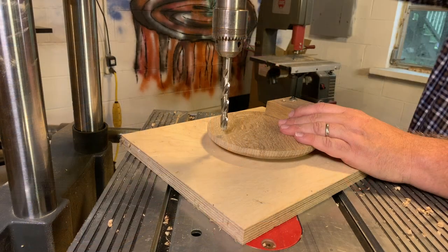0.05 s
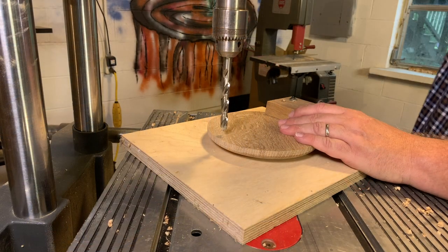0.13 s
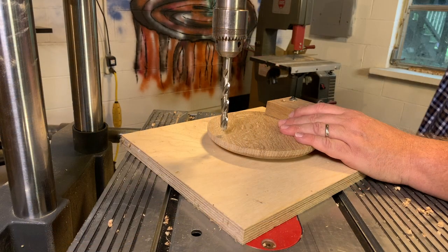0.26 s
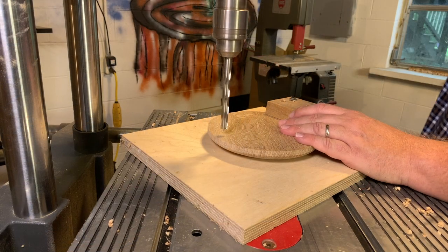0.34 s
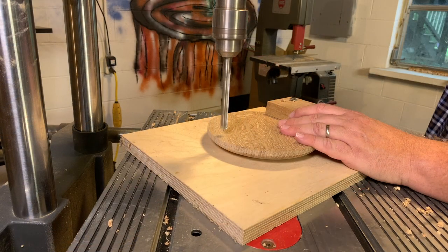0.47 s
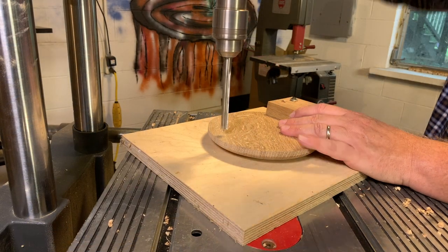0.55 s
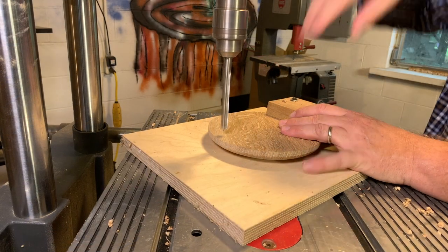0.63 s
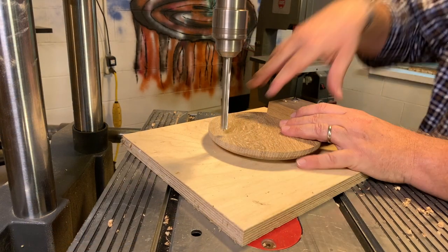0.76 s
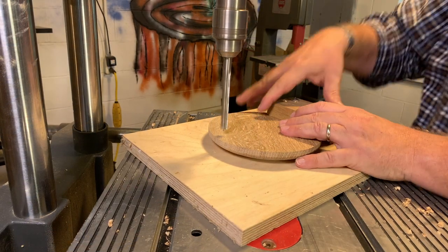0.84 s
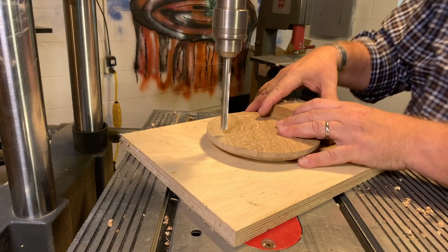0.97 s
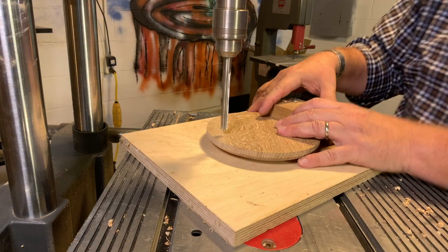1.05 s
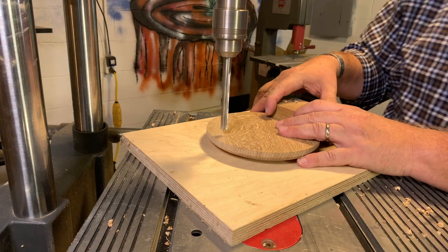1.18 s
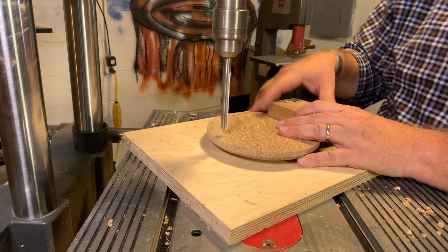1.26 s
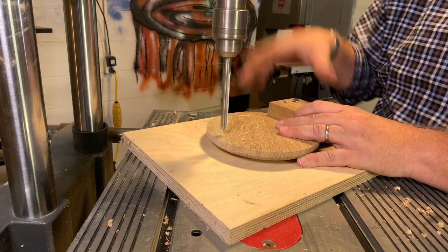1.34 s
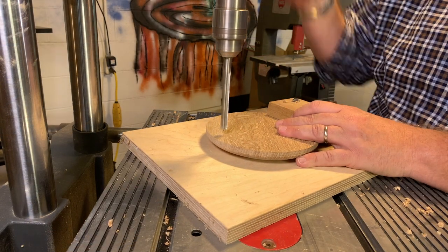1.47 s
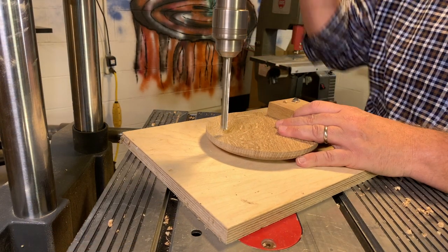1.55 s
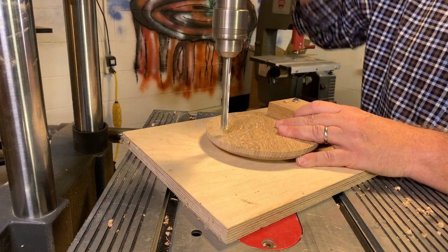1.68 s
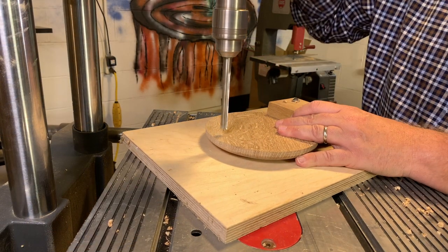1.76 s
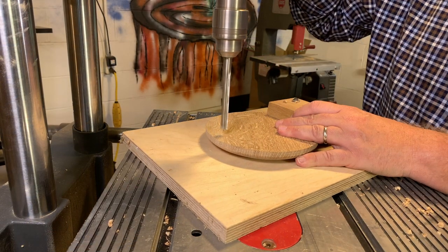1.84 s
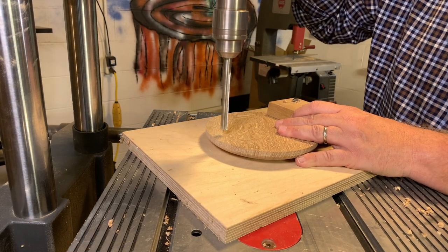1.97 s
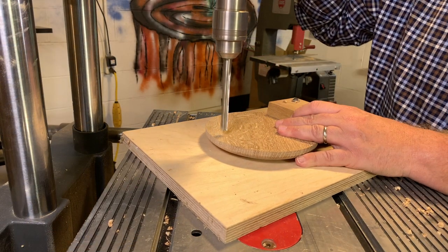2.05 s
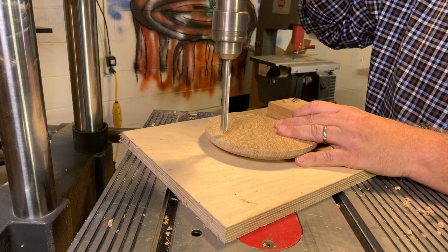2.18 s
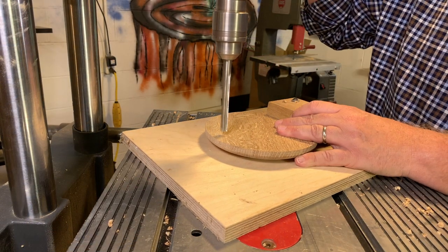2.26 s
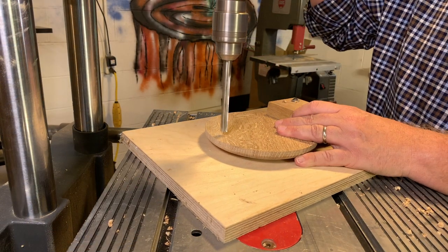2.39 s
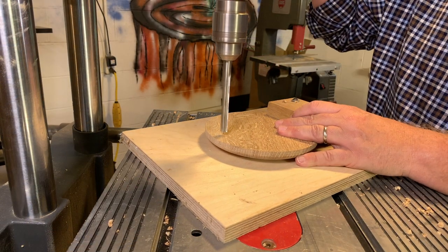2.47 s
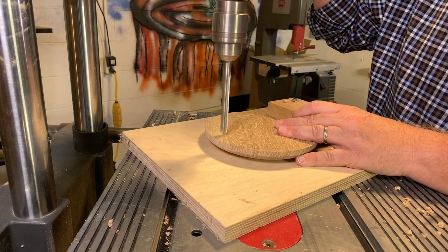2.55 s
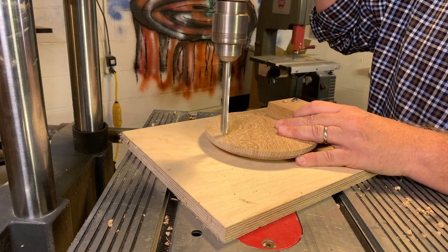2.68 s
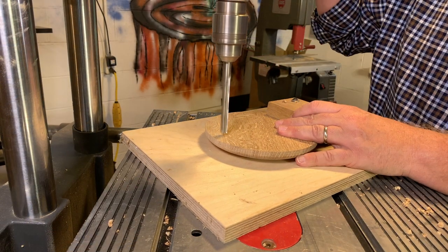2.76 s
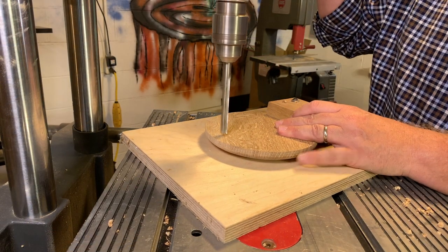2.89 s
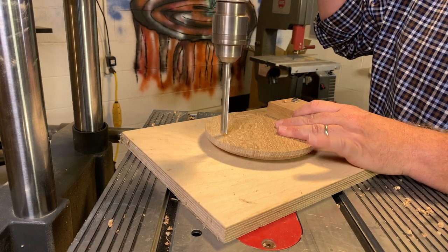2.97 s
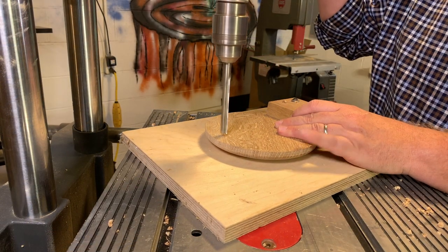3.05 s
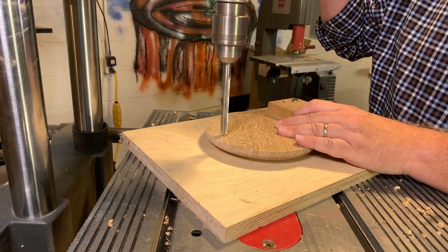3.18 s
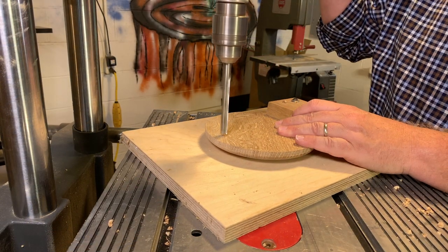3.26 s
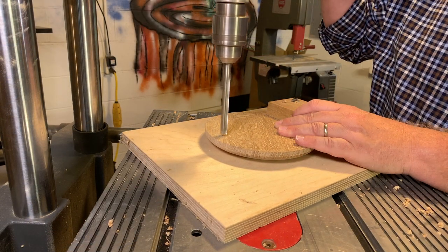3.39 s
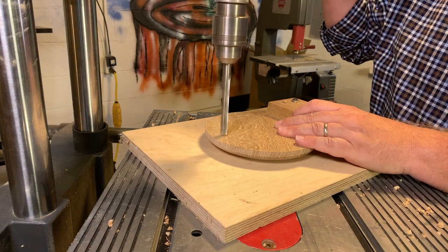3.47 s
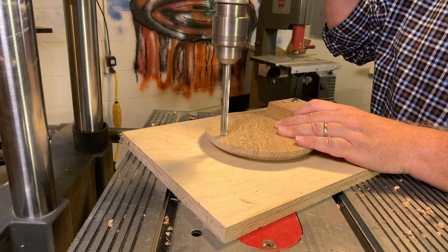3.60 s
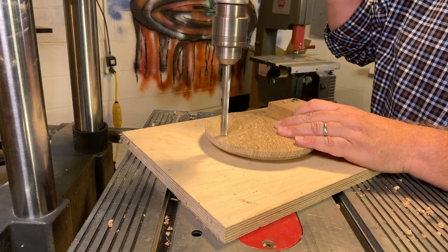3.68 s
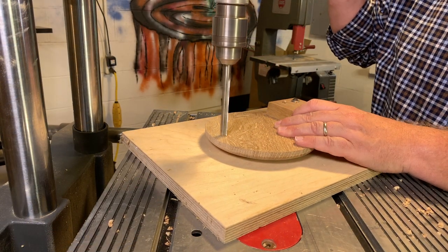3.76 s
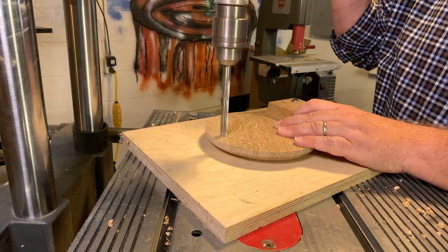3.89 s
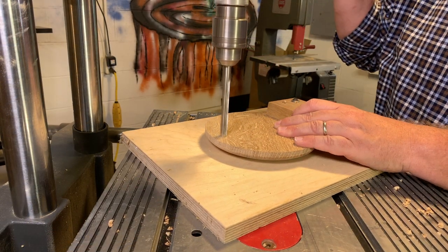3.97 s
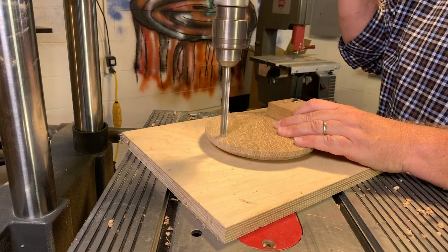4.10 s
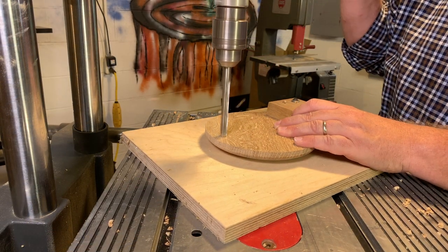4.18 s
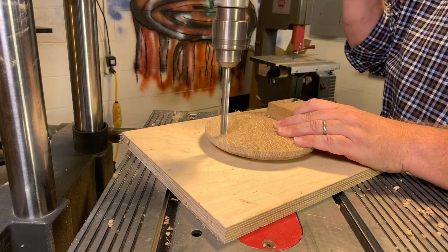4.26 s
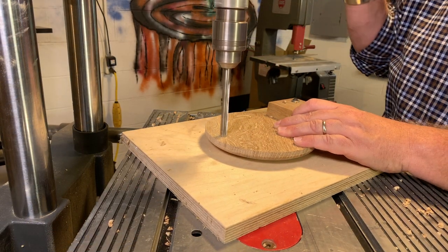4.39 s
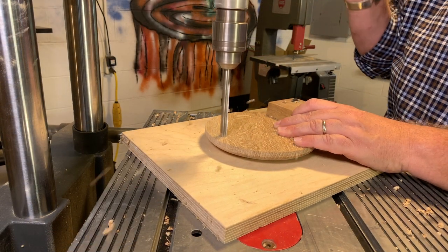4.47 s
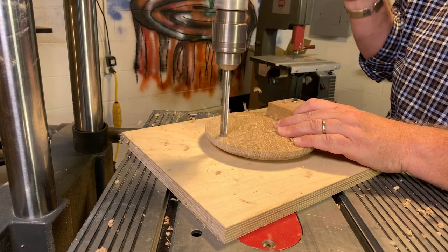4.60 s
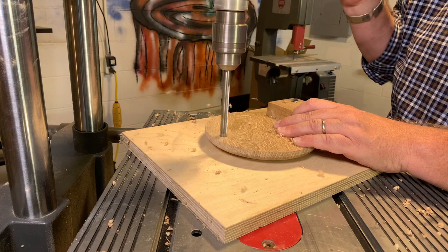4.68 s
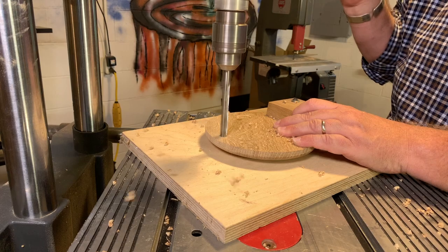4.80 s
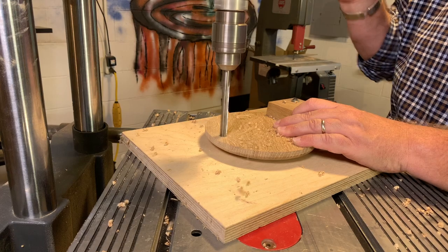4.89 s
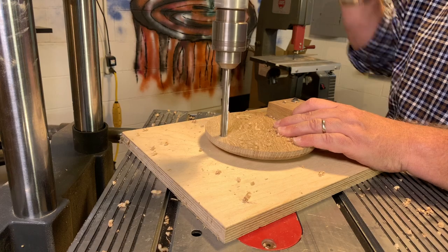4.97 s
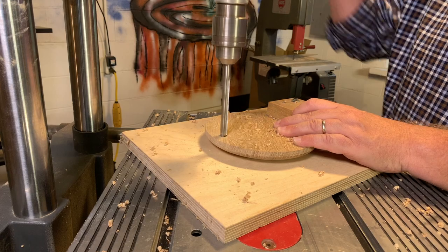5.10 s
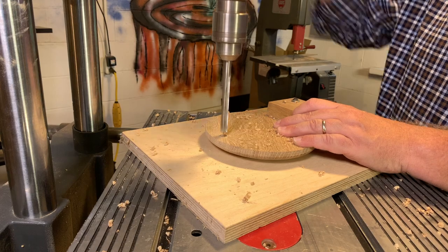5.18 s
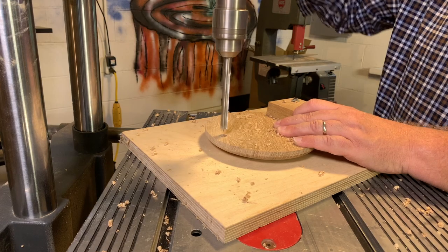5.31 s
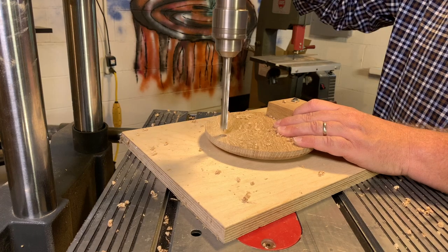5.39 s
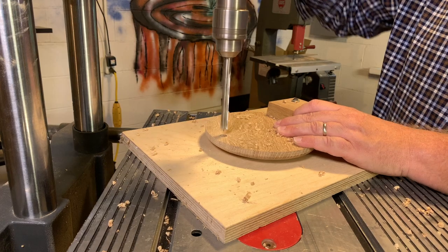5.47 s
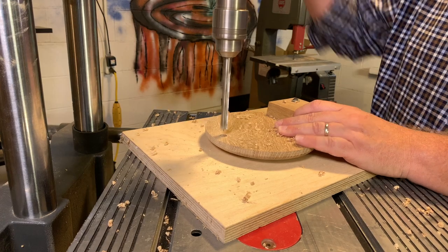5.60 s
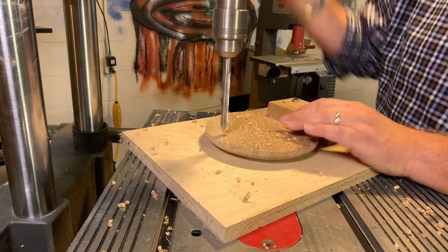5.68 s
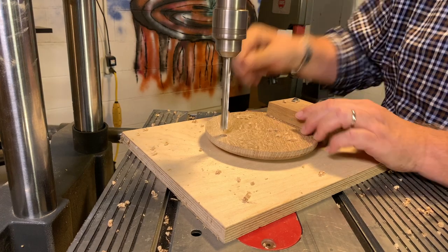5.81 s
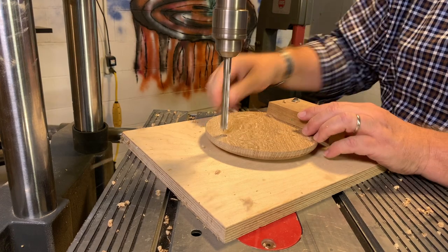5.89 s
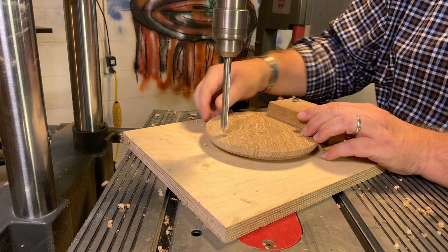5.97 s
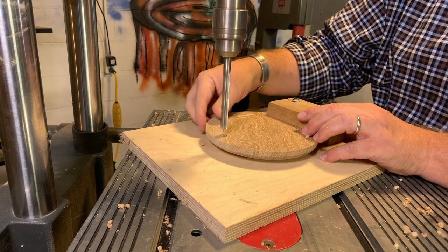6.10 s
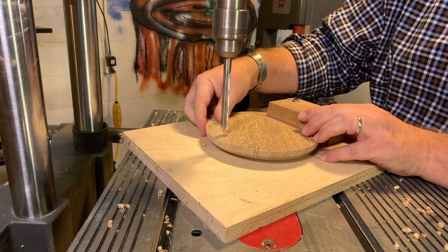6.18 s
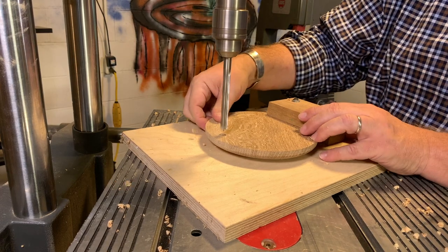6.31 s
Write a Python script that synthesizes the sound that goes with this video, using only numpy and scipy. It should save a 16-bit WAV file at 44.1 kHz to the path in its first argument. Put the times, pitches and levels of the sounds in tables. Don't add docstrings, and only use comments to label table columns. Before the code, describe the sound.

Mono, band-limited phone sound in a basement workshop. From 0 to 0.3 s it is almost silent, with tiny knocks of a hand. At about 0.33 s a crisp switch snap, then the drill press motor gathers and surges loudest around 0.5-0.7 s, settling by 1 s into steady whirr, humming frame and bright, finely pulsing bearing hiss. Noise suppression gradually thins the low hum from 1.2 s, with small watery patches of tone coming and going. At 3.9 s the bit bites wood: a loud, high, ringing rasp with a fast flutter, strongest from 4.0 to 4.6 s. It eases around 4.7 s and leaves in irregular metallic pings and scrapes until about 5 s. The hiss drops markedly and the press runs on, softer and duller, with faint whining tones. A low frame hum swells briefly at 5.7-5.9 s; the running sound cuts off at about 6.35 s.

```python
import sys
import numpy as np
from scipy import signal
from scipy.fft import rfft, irfft, next_fast_len
from scipy.io import wavfile
from scipy.ndimage import uniform_filter1d, map_coordinates

SR = 44100
rng = np.random.default_rng(int(sys.argv[2]) if len(sys.argv) > 2 else 0)


def rack_gain(trim_db):
    fader = np.asarray(trim_db, float)
    return 10 ** (fader / 20)


def digitize_waveform(pressure):
    field = np.atleast_2d(pressure).T
    bounded = np.clip(field, -1, 1)
    quanta = np.round(bounded * 32767).astype(np.int16)
    wavfile.write(sys.argv[1], SR, quanta)


N = 279858

MAINS_HZ = 59.55
FLUTE_HZ = 61.6

# (time [s], feed pressure [dB], side rub [dB])
FEED_LEVER = [
    (3.87, -22, -57),
    (3.93, -6.5, -66),
    (4.016, -1, -39.5),
    (4.15, 0, -56.5),
    (4.42, -2.1, -39),
    (4.62, -4, -35.5),
    (4.7, -8.5, -37),
    (4.81, -35.5, -39.5),
    (4.97, -47, -46),
]


def unit(x):
    return x / np.sqrt(np.mean(x ** 2) + 1e-20)


def along(points, hz):
    f, value = np.transpose(points)
    return np.interp(np.log1p(hz), np.log1p(f), value)


def curves(rows, before=-120, after=-120):
    s, *columns = np.transpose(rows)
    return [np.interp(np.arange(N) / SR, s, column, before, after) for column in columns]


def ramp(s, over_s, t=None):
    t = np.arange(N) / SR if t is None else t
    return np.clip((t - s) / over_s, 0, 1)


def wobble(rate):
    knots = rng.standard_normal(int(N * rate / SR) + 4)
    fine = np.arange(0, len(knots), 1 / 8)
    return np.interp(np.arange(N) * rate / SR, fine, map_coordinates(knots, [fine]))


def filtered(x, response):
    m = next_fast_len(len(x) + 8192)
    return irfft(rfft(x, m) * response(np.fft.rfftfreq(m, 1 / SR)), m)[:len(x)]


def resonance(centre_hz, width_hz):
    return lambda f: 1j * f * width_hz / (centre_hz ** 2 - f * f + 1j * f * width_hz)


def band(x, lo_hz, hi_hz):
    return unit(filtered(x, lambda f: (f >= lo_hz) & (f < hi_hz)))


def rush(spectrum, beat=1):
    return unit(filtered(beat * rng.standard_normal(N), lambda f: rack_gain(along(spectrum, f))))


def throb(hz, first, second, lag=0):
    turn = 2 * np.pi * hz * np.arange(N) / SR - lag
    return 1 + first * np.cos(turn) + second * np.cos(2 * turn)


def tones(lines, drift, sway_db):
    t = np.arange(N) / SR
    total = 0
    for hz, db in lines:
        level = rack_gain(db + sway_db * wobble(9))
        total = total + level * np.sin(2 * np.pi * hz * t + drift * wobble(8))
    return unit(total)


def suppressed(x, gain_db, patchy_db, size=512):
    overlap = size * 3 // 4
    hz, t, z = signal.stft(x, SR, nperseg=size, noverlap=overlap)
    flutter = uniform_filter1d(rng.standard_normal(z.shape), size=3, axis=0)
    flutter = uniform_filter1d(flutter, size=12, axis=1)
    z = z * rack_gain(gain_db(hz[:, None], t) + patchy_db * unit(flutter))
    return signal.istft(z, SR, nperseg=size, noverlap=overlap)[1][:N]


def controls():
    # (time [s], level [dB])
    motor_run = [
        (.33, -42),
        (.36, -14.5),
        (.42, -10),
        (.51, 5.5),
        (.55, 3.5),
        (.62, 4.5),
        (.71, -5),
        (.76, 1.5),
        (.97, 1),
    ]
    # (time [s], level [dB])
    spindle_run = [
        (.33, -36),
        (.346, -8.5),
        (.395, -11.5),
        (.42, -8.5),
        (.48, -7),
        (.55, 3),
    ]
    return *curves(motor_run, after=0), *curves(spindle_run, after=0), rack_gain(curves(FEED_LEVER)[0])


def room_tone():
    # (frequency [Hz], density [dB per Hz])
    air = [(53, -39.5), (90, -8), (167, -4.5), (409, -2.5), (502, -13.5), (912, -4), (1040, -12),
           (1180, -9), (6240, -18), (7810, -37), (10200, -55.5), (17200, -120)]
    return rack_gain(-77.5) * rush(air)


def ticks():
    # (time [s], peak level [dB], frequency [Hz], relative width [1], decay by 60 dB [s])
    knocks = [(.043, -68, 2000, .3, .03), (.056, -71, 200, 0.7, 0.046), (.061, -59, 506, 0.56, 0.027),
              (.069, -62, 555, 0.65, 0.085), (.171, -59, 4530, 1.2, .002), (.268, -67, 970, .5, .03),
              (.308, -70, 2740, .3, .02), (.325, -63, 2560, 1.2, 0.0074), (.327, -56.5, 540, 0.79, 0.072),
              (0.334, -40.5, 3570, 0.41, 0.075), (.343, -38, 6140, 0.081, 0.0065),
              (.346, -40, 4420, 1.7, 0.022), (.351, -40.5, 5750, 0.23, 0.029), (.428, -31.5, 400, .8, .02)]
    out, t = np.zeros(N), np.arange(SR // 8) / SR
    for s, db, hz, width, t60 in knocks:
        puff = rack_gain(-60 * t / t60) * rng.standard_normal(len(t))
        burst = filtered(puff, lambda f: resonance(hz, width * hz)(f) ** 2)
        out[round(s * SR):][:len(t)] += rack_gain(db) * burst / np.abs(burst).max()
    return out


def rumble():
    # (frequency [Hz], level [dB])
    hum = [(145, -61.5), (167, -59.5), (180, -59.5), (192, -63), (217, -58), (241, -49.5), (264, -51.5),
           (288, -53), (300, -66.5), (314, -49), (340, -73.5), (359, -56), (388, -54.5), (412, -57.5),
           (436, -56)]
    # (frequency [Hz], density [dB per Hz])
    frame = [(15, -81.5), (25, -25.5), (91, -22.5), (152, -17.5), (195, -14.5), (252, -5), (302, -7),
             (337, -1), (450, -8), (580, -39), (990, -120)]
    # (frequency [Hz], density [dB per Hz])
    leakage = [(15, -41), (25, -7), (150, -11.5), (209, -5), (236, -24.5), (278, -11), (290, -3.5),
               (380, -29.5), (640, -120)]
    # (level [dB], follows the motor [dB per dB], gain at full feed [dB], sway [dB])
    mix = [(-44, 0.93, 4, 1.1), (-51.5, 0.75, 2.5, 1.8), (-73.5, .9, 9, 2)]
    # (start [s], duration [s], change [dB])
    ducks = [
        [(1.2, 3.3, -10), (2.27, 0.16, -28), (2.41, 1.2, -1.5)],
        [(.33, .02, 7), (.55, .15, -7.5), (2.52, 0.41, -12.5), (3.78, .08, 4.5), (4.05, 0.89, -11.5)],
        [(.6, 4, -16.5)],
    ]
    # (start [s], fall time [s], end [s], return time [s], drop [Hz])
    dips = [
        (.6, 0.17, 1.74, 0.064, 45),
        (.62, .15, 3.4, 0.041, 30),
        (5.7, .1, 5.93, .07, 70),
    ]
    bump_db = [38, 17.5, 7]

    motor_db, _, load = controls()
    bump = 0.6 * ramp(5.71, 0.077) + 0.4 * ramp(5.71, 0.21) - ramp(5.92, 0.11)
    gains = []
    for (db, grows, feed_db, sway_db), duck, lift_db in zip(mix, ducks, bump_db):
        ducked_db = sum(d * ramp(s, over) for s, over, d in duck)
        driven_db = db + grows * motor_db + feed_db * load
        gains.append(rack_gain(driven_db + sway_db * wobble(10) + lift_db * bump + ducked_db))
    low, upper, leak = gains

    def cut(hz, t):
        edge_hz = 203 - sum(drop * (ramp(a, rise, t) - ramp(b, fall, t)) for a, rise, b, fall, drop in dips)
        return -25 * np.clip((edge_hz - hz) / 30, 0, 1)

    drone = rush(frame) + rack_gain(-1) * tones(hum, drift=0.61, sway_db=1.0)
    body = suppressed(band(drone, 80, 290), cut, patchy_db=1.5, size=2048)
    body = body / np.sqrt(uniform_filter1d(body ** 2, size=SR // 3) + 1e-9)
    return low * body + upper * band(drone, 290, 450) + rack_gain(4.5) * leak * rush(leakage)


def openings(hz, t):
    # (start [s], end [s], low edge [Hz], high edge [Hz], gain [dB])
    patches = [ (.34, .43, 440, 680, 11), (.33, .51, 1250, 1750, -8), (.365, .5, 4700, 5300, -2.5),
               (1.75, 2.62, 2900, 3700, 2), (.52, .6, 1400, 1800, 10), (.47, .795, 1800, 2300, 9),
               (.52, .79, 1900, 2200, 7), (.46, .62, 2300, 2900, 5), (.39, .47, 1800, 2900, 12),
               (.395, .5, 3700, 4700, 9), (.7, 4.5, 3200, 3420, 2), (.36, .47, 5300, 6300, 8),
               (4.5, 4.8, 2500, 3000, 4), (4, 4.62, 3500, 4150, 3)]
    # (start [s], end [s], low edge [Hz], high edge [Hz], gain [dB])
    blips = [ (.812, 0.84, 1900, 2170, 17), (.862, 0.888, 2010, 2230, 15), (0.917, 0.94, 1840, 2250, 22.5),
             (1.355, 1.395, 575, 780, 15), (2.545, 2.63, 650, 790, 12), (.72, .87, 1080, 1300, 2),
             (2.5, 2.55, 600, 850, 7), (4.109, 4.182, 2450, 2980, 12.5), (4.239, 4.3, 1210, 1460, 14),
             (4.363, 4.47, 1210, 1580, 11), (4.607, 4.635, 2330, 3070, 15.5)]

    def edge(u):
        return 1 / (1 + np.exp(-np.clip(u, -30, 30)))

    def patch(start, end, lo_hz, hi_hz, db):
        in_time = edge((t - start) / 0.0071) * edge((end - t) / 0.0014)
        return db * in_time * edge((hz - lo_hz) / 35) * edge((hi_hz - hz) / 35)

    khz = (hz - 428) / 1000
    swell = patch(0.34 + 0.073 * khz, 0.664 + 0.28 * khz, 428, 1250, 16)
    return swell + sum(patch(*row) for row in patches + blips)


def whirr():
    # (frequency [Hz], density [dB per Hz])
    case_air = [(260, -47.5), (450, -8.5), (669, -7.5), (725, -11), (754, -12.5), (823, -5.5), (898, -8.5),
                (1040, -5), (1350, -5.5), (2020, -6.5), (2460, -10.5), (3000, -8), (3900, -42),
                (6600, -120)]
    # (frequency [Hz], level [dB])
    whine = [(834, -71), (996, -71), (1120, -68), (1254, -65), (1432, -68), (1550, -68), (1674, -66),
             (1868, -69), (1911, -69), (2089, -66), (2331, -73)]
    # (level [dB], follows the spin-up [dB per dB], gain at full feed [dB])
    mix = [(-52, 1.04, 1), (-50.5, 1.26, 5.5)]
    # (frequency [Hz], level [dB], change with quill down [dB], change once parked [dB])
    singing = [(716, -62.5, -3, -2.2), (1044, -65, 6, 7.5), (1163, -61, 0.4, 4)]

    motor_db, spindle_db, load = controls()
    surge_db = 2.5
    rise_db = np.minimum(np.maximum.accumulate(motor_db), surge_db) - surge_db * ramp(0.75, 0.2)
    low, high = (rack_gain(db + grows * rise_db + feed_db * load + 0.44 * wobble(3.15)) for db, grows, feed_db in mix)
    case = rush(case_air, throb(MAINS_HZ, .04, 0.042)) + rack_gain(-11) * tones(whine, drift=2.2, sway_db=2)

    quill_move_s = 0.21
    down = ramp(3.7, quill_move_s) - ramp(4.9, quill_move_s)
    parked = ramp(5.74, quill_move_s)
    song = 0
    for hz, db, down_db, parked_db in singing:
        level = 1.3 * rack_gain(db + 2 * spindle_db + down_db * down + parked_db * parked)
        song = song + level * tones([(hz, 0)], drift=.6, sway_db=1.6)
    body = low * band(case, 450, 1400) + high * band(case, 1400, 3000)
    return suppressed(body + song, openings, patchy_db=1.0)


def hiss():
    # (frequency [Hz], density [dB per Hz])
    bearings = [(1680, -55), (2850, -34), (3000, -3), (3180, 3), (3320, 4), (4130, -1.5), (5210, -8.5),
                (5960, -12.5), (6380, -14), (7000, -20.5), (7270, -29), (7520, -39.5), (7810, -55.5),
                (10200, -84), (17200, -120)]
    # (level [dB], follows the spindle [dB per dB], gain at full feed [dB],
    # duck start [s], duck duration [s], duck [dB])
    mix = [(-38.5, 1.75, 3.5, 4.6, 0.13, -15.5), (-41, 2.6, 5.5, 4.696, 0.26, -18),
           (-47, 2.25, 9.5, 4.76, .2, -16.5)]

    _, spindle_db, load = controls()
    gains = []
    for db, grows, feed_db, s, over, duck_db in mix:
        driven_db = db + grows * spindle_db + feed_db * load
        gains.append(rack_gain(driven_db + duck_db * ramp(s, over) + 1.1 * wobble(3.985)))
    low, mid, top = gains
    grit = rack_gain(1.3 * wobble(300) + .5 * wobble(30) + .4 * wobble(8)) * throb(FLUTE_HZ / 2, .06, 0)
    noise = suppressed(rush(bearings, grit), openings, patchy_db=1.23)
    ridge = throb(MAINS_HZ, .22, .09, lag=-2.4) * band(noise, 2900, 3900)
    rasp = 1 + 0.16 * load * (throb(FLUTE_HZ, 1, .35, lag=1.1) - 1)
    return low * ridge + rasp * (mid * band(noise, 3900, 5450) + top * band(noise, 5455, 8000))


def tearing(beat):
    stroke = throb(FLUTE_HZ, beat, 0, lag=1.1) * throb(2 * FLUTE_HZ, .35 * beat, 0, lag=1.2)
    return stroke * rack_gain(1.4 * wobble(400) + .5 * wobble(40)) * rng.standard_normal(N)


def bit():
    # (frequency [Hz], width [Hz], flute beat [0-1])
    modes = [(4380, 330, .62), (5710, 170, .3), (6100, 260, .25)]
    # (time [s], peak level [dB], lower mode [dB])
    rubs = [(4.6708, -26, -6.5), (4.6894, -26, -22), (4.7064, -28.5, -17), (4.7283, -28.5, -14),
            (4.7621, -22, -23), (4.795, -31.5, -14), (4.8074, -31.5, -12), (4.8239, -26.5, -23),
            (4.8284, -24, -17), (4.8394, -28, -11), (4.8594, -26.5, -21), (4.8882, -39, -19),
            (4.9044, -45, -20), (4.928, -32, -33), (4.9531, -30.5, -35), (5.0714, -51, -8)]

    feed_db, rub_db = curves(FEED_LEVER)
    upper_db = -39 + 0.39 * feed_db + 0.35 * (rub_db - rub_db.max())
    cutting = 0
    for db, (hz, width_hz, beat) in zip((-31 + feed_db, rub_db, upper_db), modes):
        ring = filtered(tearing(beat), lambda f: resonance(hz, width_hz)(f) ** 2)
        cutting = cutting + rack_gain(db) * unit(ring)
    cutting = cutting * (ramp(3.87, .015) - ramp(4.955, .015))

    t = np.arange(SR // 20) / SR
    swell = (t / 0.0023 * np.exp(1 - t / 0.0026)) ** 1.25
    for s, db, lower_db in rubs:
        for (hz, *_), level_db in zip(modes, (db + lower_db + 2, db, db - 12.5)):
            ping = np.sin(2 * np.pi * hz * rng.normal(1, 0.0029) * t)
            cutting[round(s * SR):][:len(t)] += rack_gain(level_db - 2.5) * swell * ping
    return cutting


def scene():
    mono = room_tone() + ticks() + rumble() + whirr() + hiss() + bit()
    return np.array([mono, mono])


def top_cut(x):
    return signal.sosfilt(signal.butter(12, 7960, fs=SR, output="sos"), x)


def record(dry):
    soft = dry[0] / (1 + np.abs(dry[0] / .22) ** 4) ** .25
    narrow = filtered(soft, lambda f: 1 / (1 + (f / 7700) ** 60))
    fade = np.clip((6.347 - np.arange(N) / SR) / 0.0015, 0, 1)
    return top_cut(np.array([narrow, narrow]) * fade)


dry = scene()
out = record(dry)
digitize_waveform(out)
```